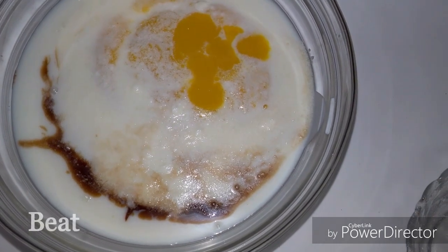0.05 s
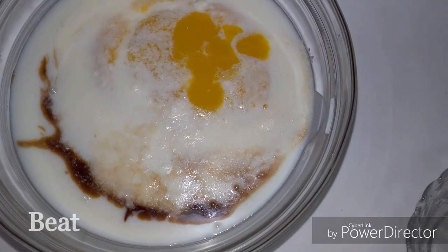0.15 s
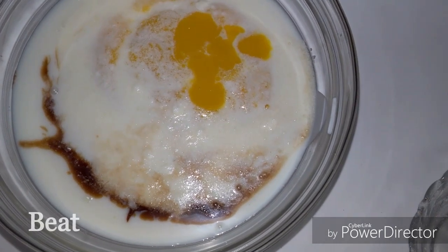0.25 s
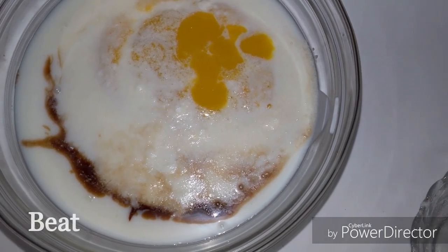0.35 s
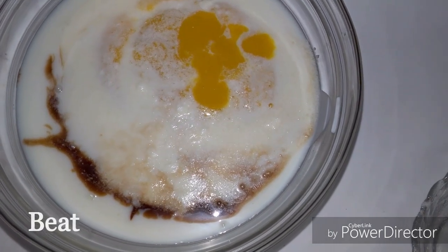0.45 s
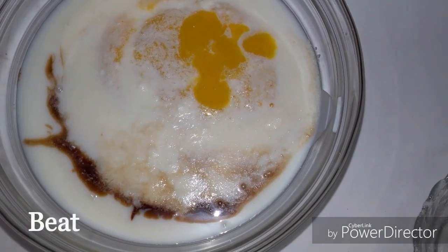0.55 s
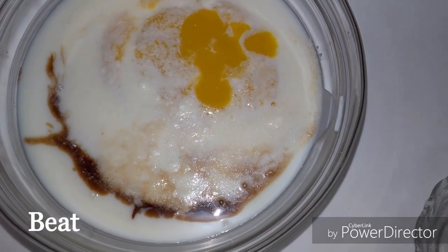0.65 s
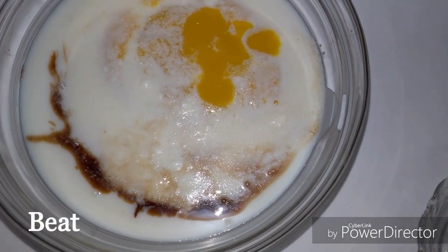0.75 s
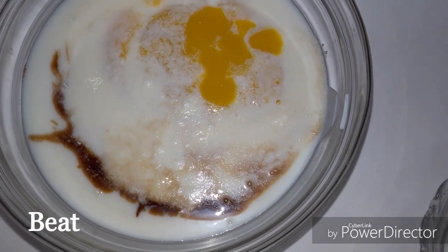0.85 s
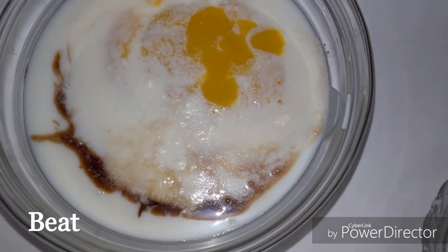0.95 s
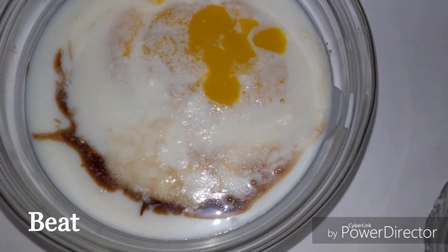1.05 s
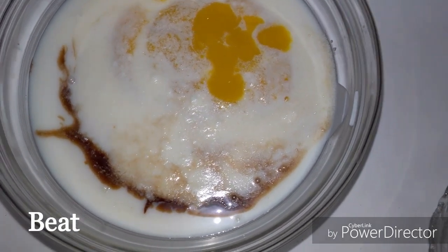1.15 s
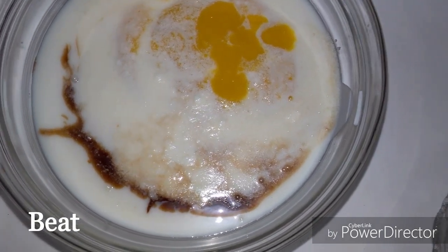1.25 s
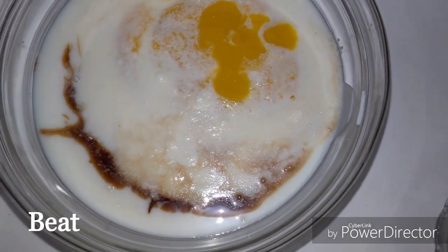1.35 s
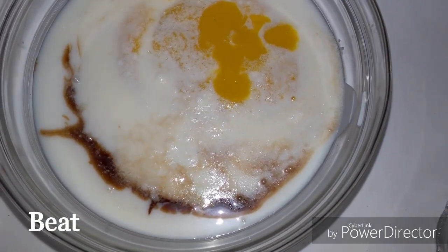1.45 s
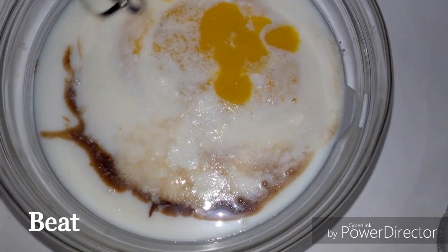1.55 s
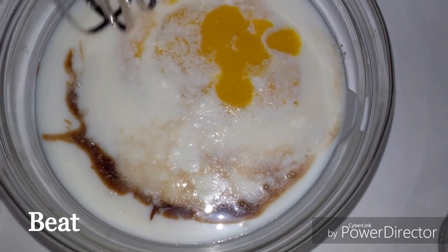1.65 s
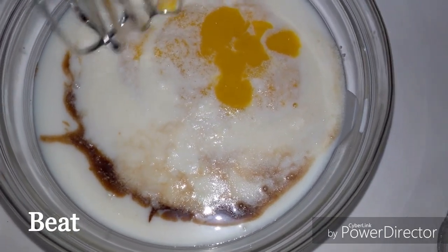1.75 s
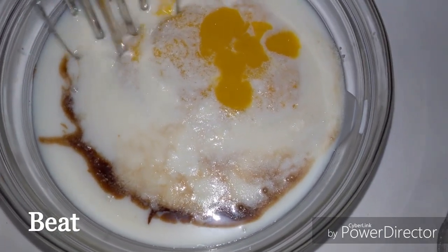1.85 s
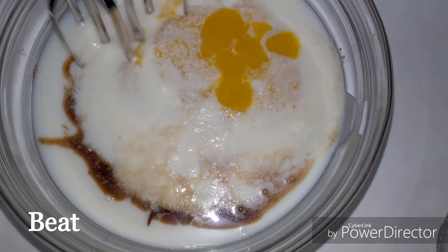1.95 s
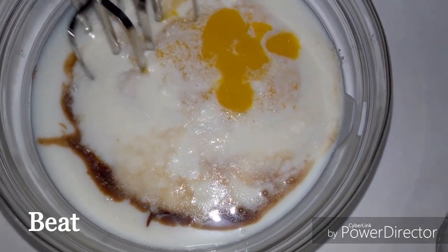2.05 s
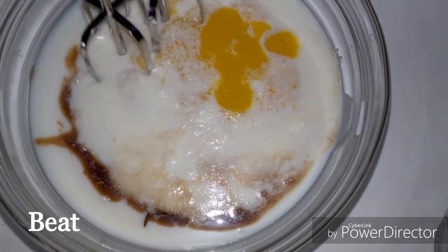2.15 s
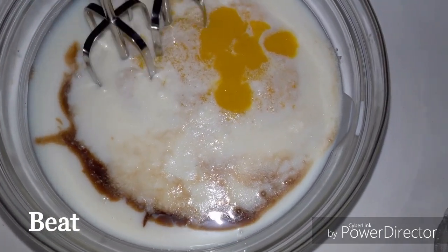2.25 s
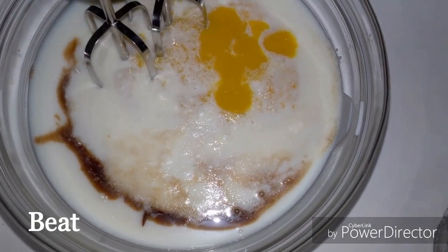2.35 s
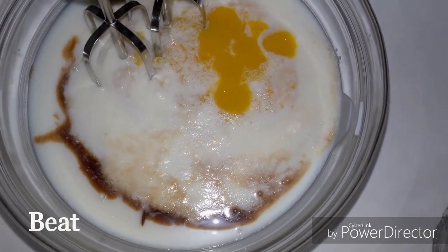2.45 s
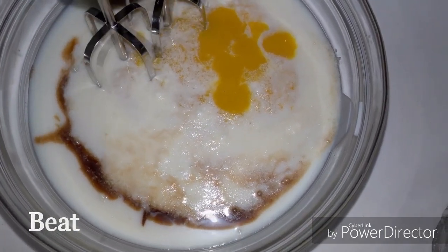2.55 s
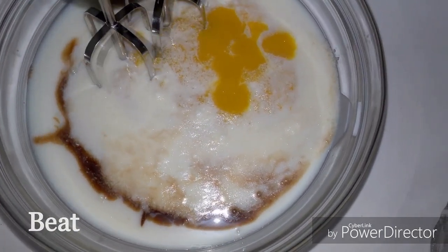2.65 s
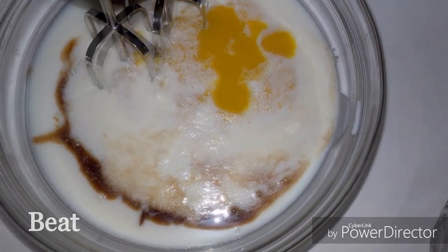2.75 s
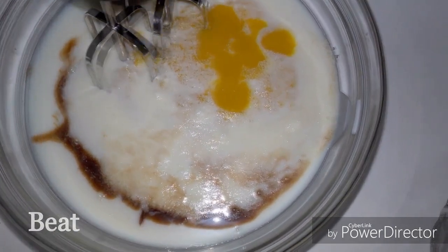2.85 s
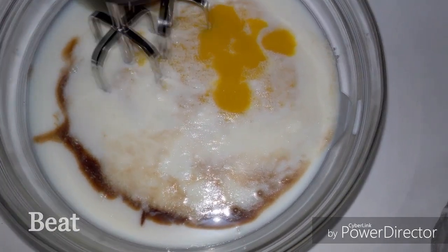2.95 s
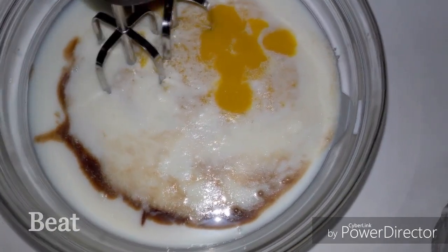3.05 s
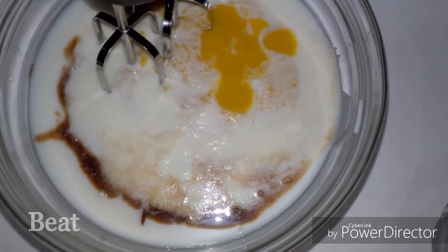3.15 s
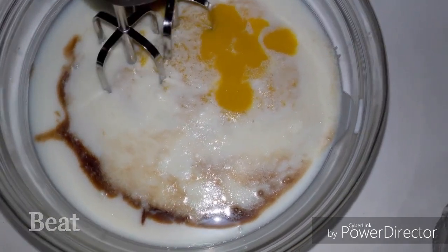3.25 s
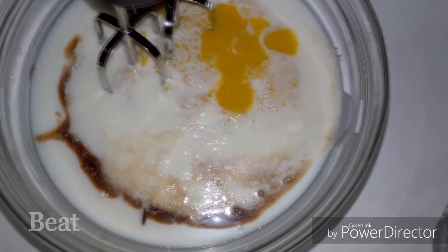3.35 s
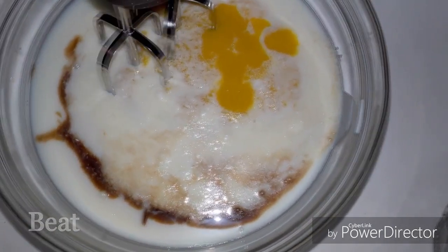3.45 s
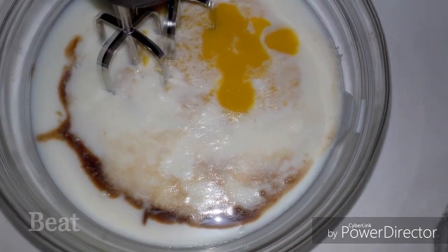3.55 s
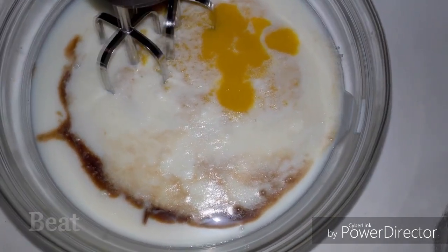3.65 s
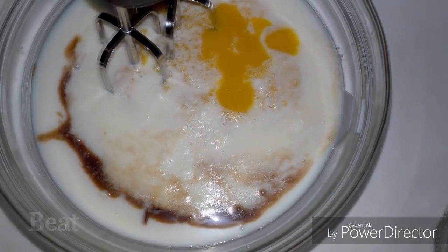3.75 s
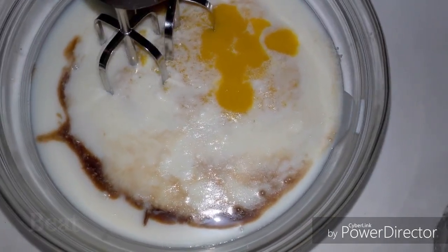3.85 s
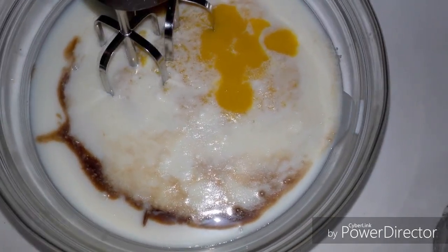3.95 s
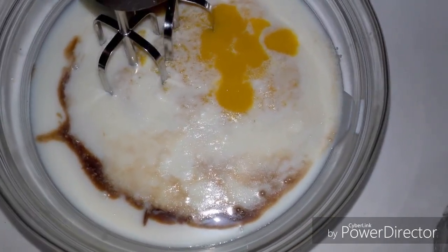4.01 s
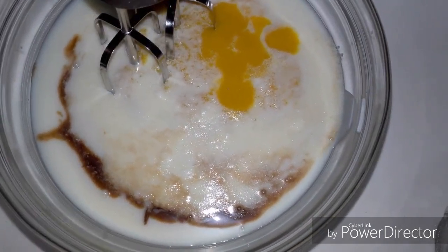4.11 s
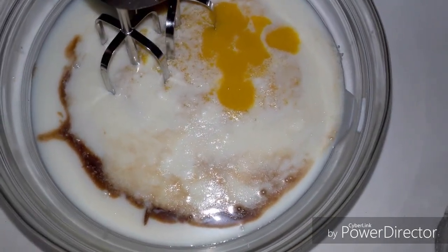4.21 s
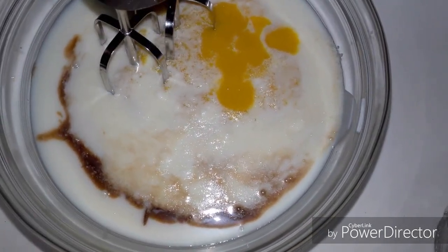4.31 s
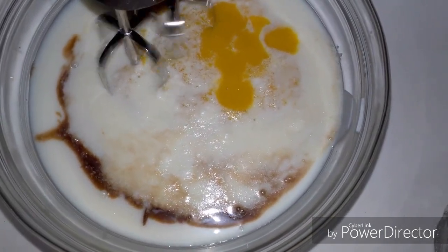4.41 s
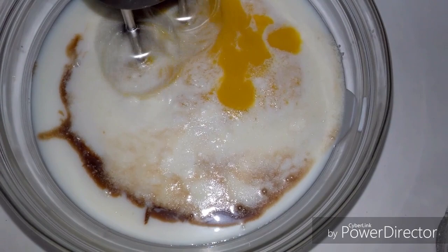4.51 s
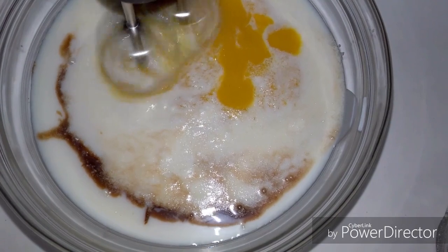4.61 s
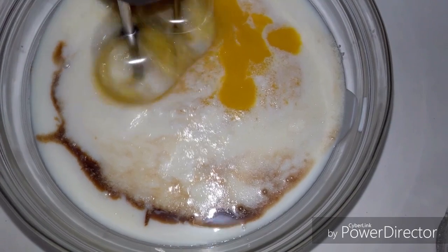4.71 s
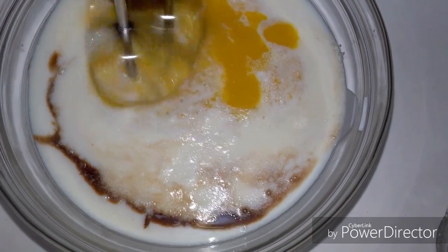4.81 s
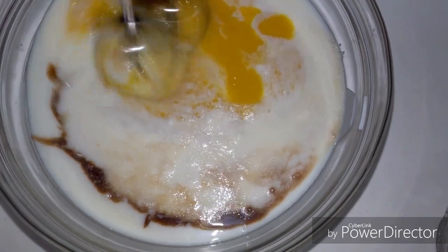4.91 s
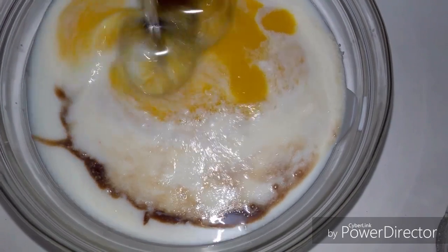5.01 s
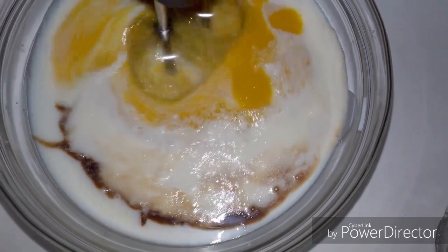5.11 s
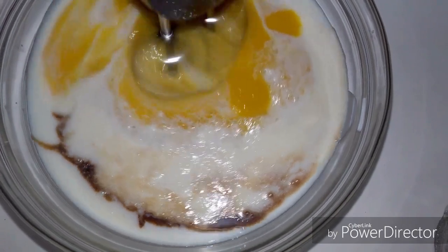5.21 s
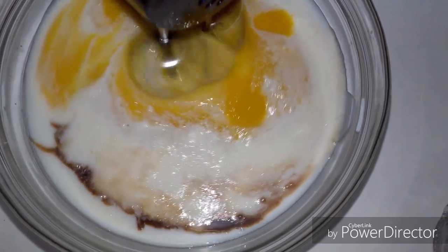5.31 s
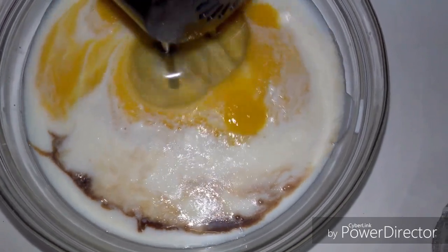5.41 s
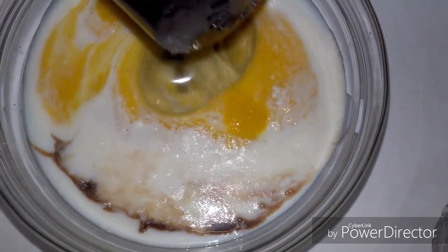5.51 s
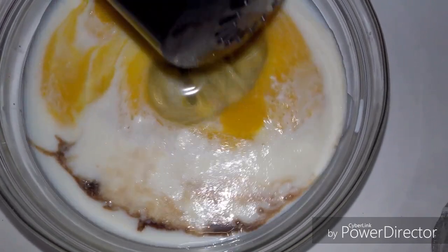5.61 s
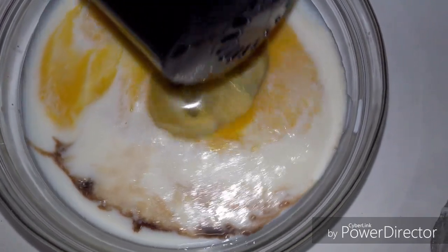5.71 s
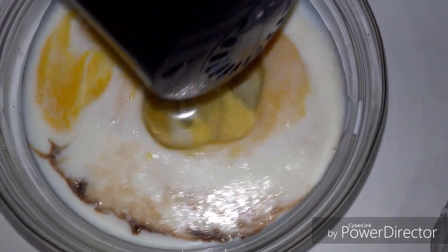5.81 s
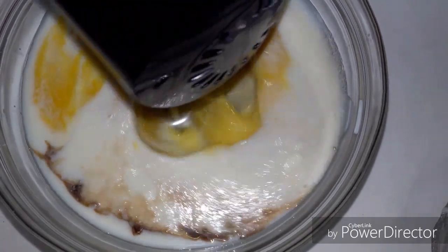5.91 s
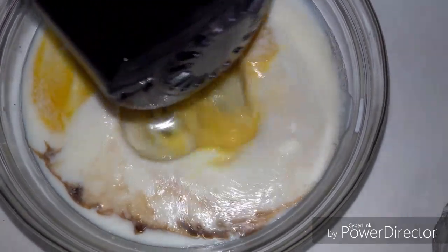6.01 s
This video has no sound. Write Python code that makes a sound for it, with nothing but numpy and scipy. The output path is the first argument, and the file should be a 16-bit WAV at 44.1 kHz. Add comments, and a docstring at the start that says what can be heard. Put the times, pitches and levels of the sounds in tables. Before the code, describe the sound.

Metal beaters clink and latch into a plastic mixer, a pause, then a switch clicks and the motor whines up to speed, churning liquid.

```python
"""Electric hand mixer in a kitchen

Steel beaters ring as decaying modes and knock into a plastic case as short noise-like bursts, over filtered
room noise that sinks slowly, then drops abruptly. A switch clicks on and a mains motor runs up: its speed
drives a slot whine, fan tones, a shaft hum, rushing air and brush hiss, while the beaters tap the case and
churn a liquid, heard as rising bubbles over a low swell."""
import sys
import numpy as np
from scipy import signal
from scipy.fft import rfft, irfft
from scipy.io import wavfile
from scipy.ndimage import uniform_filter1d

SR = 44100
rng = np.random.default_rng(int(sys.argv[2]) if len(sys.argv) > 2 else 0)


def transcribe(u):
    """Save the signal u as a 16-bit wav file named by the first command-line argument.

    u: samples, shape (n,) or (channels, n), limited to [-1, 1]; the rate is SR.
    q: integer samples, one column per channel.
    """
    v = np.clip(np.atleast_2d(u).T, -1, 1)
    q = np.round(v * 32767).astype(np.int16)
    wavfile.write(sys.argv[1], SR, q)


N = 267687
T = np.arange(N) / SR
HZ = np.fft.rfftfreq(N, 1 / SR)

# Noise spectra, relative levels: freq_hz, density_db (per Hz)
ROOM_SPECTRUM = [(18, -55), (30, -29), (32, -44), (59, -19.5), (270, -3), (389, -7.5), (591, -4),
                 (656, -12), (808, -7.5), (1080, -10.5), (1260, -11.5), (2360, -15), (5310, -30.5),
                 (11000, -29), (15500, -29.5)]
RUB_SPECTRUM = [(800, -11.0), (2500, 2.0), (4500, -6.0), (6500, -3.0), (9000, -8), (15000, -11.5)]
# the liquid starting to turn
HEAVE_SPECTRUM = [(30, -22), (70, -14), (115, 1), (190, -3), (400, -30), (2000, -70)]
# air through the vents
AIR_SPECTRUM = [(60, -30), (150, -17.5), (300, -9), (470, -13), (580, 0), (1000, -5.5), (2200, -2),
                (3400, 0), (4300, -18.5), (6000, -45), (15000, -40)]
# carbon brushes on the commutator
BRUSH_SPECTRUM = [(500, -43), (2000, -15.5), (3100, -6.5), (4300, -15.5), (5000, -11.5), (5900, -9.5),
                  (6300, -5), (6650, 0), (7100, -6.5), (7700, -11.5), (9300, -19), (10500, -20),
                  (12000, -25.5), (15500, -28)]

# Resonances, as humps added to a level or spectrum: centre_hz, width_hz, boost_db
# the room
ROOM_MODES = [(192, 54, 6), (271.6, 5.3, 9.5), (420, 200, -2.5), (635, 69, 3), (777, 185, 5.5),
              (1238, 37, 6)]
# the hollow plastic case
CASE_RESONANCES = [(662, 160, 24), (1190, 480, 13.5), (1720, 320, 4.5), (2840, 240, 4.5), (3250, 460, 11),
                   (4480, 280, -11.5), (5280, 220, 2), (6620, 580, 9), (7240, 390, 8.5)]
# the air vents
VENT_RESONANCES = [(654, 147, 10), (800, 105, 9), (1245, 290, 13), (1714, 210, 10.5), (1996, 65, 9.5),
                   (2405, 100, 9.5), (3060, 80, 12), (3220, 240, 4.5), (3800, 300, 14.5)]
# the motor frame, swept by the armature whine
FRAME_RESONANCES = [(1260, 630, 14), (2170, 200, 4), (2570, 190, 4.5), (2830, 570, 22.5)]
# the fan housing, swept by the fan tones
HOUSING_RESONANCES = [(1150, 380, 13), (3120, 520, 4.5), (3820, 230, 11), (4300, 630, -8.5),
                      (5320, 780, 6.5)]

# Ringing modes: mode_hz, level_db (relative), t60_s
# the two steel beaters
FIRST_BEATER = [(5700, -14, 0.13), (6400, -6.5, 0.14), (6660, -10.5, 0.11), (6700, -4.5, 0.092),
                (7540, -19, 0.16), (10940, -9.5, 0.24), (12060, -1, 0.11), (11820, -10, .08),
                (12810, -2, 0.14), (13780, -20, .05)]
SECOND_BEATER = [(4200, -5, 0.066), (5740, 6, 0.028), (6200, 3, 0.1), (7540, -10.5, .06), (8770, -6, 0.097),
                 (10530, -4, 0.12), (10070, -13, 0.13), (11190, -1, 0.14), (11400, -7, 0.14),
                 (12300, -6, .06), (14320, -4, 0.23)]
# the hard clack as a beater is picked up
CLACK_MODES = [(1655, -6, 0.12), (2130, 3, 0.044), (2207, 8.5, 0.038), (3005, -4, 0.052),
               (3850, -0.5, 0.052), (4280, -8, 0.11), (6620, -41, 0.11), (7870, -18, .08)]

# Hands sliding over the mixer: strongest_s, level_db, half_length_s
RUBS = [(0.02, -57, 0.026), (0.44, -52, 0.16), (1.15, -63, 0.36)]
# Beater clinks: start_s, ring_db, struck_hz, lead_db (boost of modes near struck_hz), beater (0 or 1),
# tick_db (contact tick relative to the ring)
CLINKS = [(.019, -43, 12100, 15, 0, -7), (.099, -42, 5717, 10, 0, -9), (.178, -42.5, 12200, -7, 0, -6),
          (.253, -43.5, 11440, -1, 1, -6), (.312, -40, 12200, 6, 0, -15), (.373, -38, 12100, 8, 0, -7),
          (0.397, -26, 12800, 23, 0, -10), (0.424, -20, 12800, 8, 0, -8), (.472, -26, 12800, 17, 0, -10),
          (.489, -29.5, 6800, 22, 0, -9), (0.694, -29.5, 14370, 0, 1, 0.5), (0.77, -40, 6450, -6, 0, -8),
          (.881, -48, 12100, 14, 0, -10), (1.557, -34, 14370, 3, 1, 3.5)]
# The hard clack, a single row: start_s, peak_db
CLACK = (.9258, -24.5)
# Knocks on the plastic case: start_s, snap_peak_db, snap_centre_hz, snap_t60_s, thud_peak_db
KNOCKS = [(0.166, -45, 7000, .04, -53), (.194, -44, 7000, .015, -50), (.343, -42, 4000, 0.043, -36),
          (.768, -35.5, 4200, 0.028, -34.5), (.909, -42, 6000, .024, -52), (.9255, -38, 7060, .04, -28.5),
          (0.943, -33.5, 11500, .05, -33.5), (1.289, -50, 7000, .06, -40.5),
          (1.5061, -23.5, 6500, 0.0094, -35.5), (2.178, -40, 12000, .02, -58),
          (2.304, -27.5, 7500, 0.0099, -24.5), (2.578, -35.5, 3220, 0.044, -35),
          (2.587, -22.5, 3430, 0.013, -24.5), (2.871, -40, 4300, .025, -32.5), (3.581, -66, 4370, .04, -49),
          (4.073, -58, 2800, .02, -54), (4.438, -67, 5000, .02, -60)]
# Spinning beaters tapping the case: start_s, peak_db, centre_hz
TAPS = [(4.9, -26, 1017), (4.946, -22.5, 1260), (5.936, -27, 1050), (6.012, -21, 1130)]
# The liquid heaving as the beaters set it moving, a single row: strongest_s, level_db, half_length_s
HEAVE = (5.0, -66.5, 0.38)
# The liquid slowing the motor as the beaters first catch it, a single row:
# deepest_s, sag_turns_per_s, half_length_s
DRAG = (4.83, 11, 0.1234)

# Room noise: level at the start, slow sink, and the moment it drops to its quiet level
ROOM_DB, ROOM_SINK_DB_PER_S, DROP_S, QUIET_DB = -47.5, 1.5, 3.24, -66.5
# Every knock is a short bright snap, then a broader, duller thud of the case
SNAP_OCTAVES = 0.35
THUD_DELAY_S, THUD_PITCH_SHARE, THUD_OCTAVES, THUD_T60_S = 0.0015, 0.46, 1.32, 0.052
# The switch slides home in quick clicks, each louder than the one before
SWITCH_S, SWITCH_GAP_S, SWITCH_FIRST_DB, SWITCH_STEP_DB = 4.5375, 0.0058, -39, 9
# Run-up: a quick surge, then a slow approach to top speed (shaft turns a second)
POWER_ON_S, TOP_SPEED, SURGE_SHARE, SURGE_S, APPROACH_S = 4.5341, 284.22, 0.532, 0.0944, 0.2762
# The motor sound fades in once the rotor has broken loose
RUNNING_S, RUNNING_RISE_S = 4.56, 0.023
# Motor layers: level at top speed, before any resonances, and growth per octave of speed
AIR_DB, AIR_DB_PER_OCTAVE, AIR_LEAST_DB = -29.5, 9, -38
BRUSH_DB, BRUSH_DB_PER_OCTAVE = -25.5, 19.5
BLADE_DB, BLADE_DB_PER_OCTAVE = -42.5, 10
OVERTONE_DB, OVERTONE_DB_PER_OCTAVE = -41, 8.5
# The whine follows only the frame resonances
ARMATURE_DB = -46.5
# Upper band limit of the microphone
EDGE_HZ = 15650


def gain_of(db):
    """Turns decibels into a gain factor."""
    return 10 ** (np.asarray(db) / 20)


def evened(x):
    """Scales a signal to an rms of 1."""
    return x / np.sqrt(np.mean(x ** 2) + 1e-20)


def read(points):
    """Joins spectrum points in dB along a log-frequency axis."""
    hz, db = np.transpose(points)
    return np.interp(np.log(HZ + 1), np.log(hz), db)


def humps(modes, at=HZ):
    """Sums the dB that a set of resonances adds at the given frequencies."""
    return sum(db / (1 + (2 * (at - hz) / width) ** 2) for hz, width, db in modes)


def coloured(x, db):
    """Filters by a dB spectrum and evens the result to an rms of 1."""
    return evened(irfft(rfft(x) * gain_of(db), N))


def drift(hz):
    """Makes slow random movement up to about the given rate, with an rms of 1."""
    return evened(irfft(rfft(rng.standard_normal(N)) * np.exp(-(HZ / hz) ** 2), N))


def swell(peak_s, half_length_s):
    """Draws a smooth bell-shaped rise and fall in time, with a peak of 1."""
    return np.exp(-((T - peak_s) / half_length_s) ** 2)


def high_pass(x, hz):
    """Takes away the bass below hz."""
    return signal.sosfilt(signal.butter(3, hz, "high", fs=SR, output="sos"), x)


def add(mix, start_s, sound):
    """Mixes a sound in at its start time."""
    part = mix[max(round(start_s * SR), 0):][:len(sound)]
    part += sound[:len(part)]


def ring(hz, db, t60):
    """Sums decaying sine modes in random phase, with a peak of 1."""
    t = np.arange(SR // 4)[:, None] / SR
    decay = gain_of(db - 60 * t / t60)
    tones = np.sin(2 * np.pi * (hz * t + rng.random(len(hz))))
    sound = (decay * tones).sum(axis=1)
    return sound / abs(sound).max()


def burst(centre_hz, octaves, t60, contact=0.058):
    """Packs dense, damped modes into a burst coloured by the hollow case, with a peak of 1."""
    t = np.arange(8192) / SR
    hz = np.fft.rfftfreq(len(t), 1 / SR)
    distance = np.log2((hz + 1) / centre_hz) / octaves
    shape = gain_of(humps(CASE_RESONANCES, hz)) / (1 + distance ** 2) ** 0.75
    # the parts scrape together for a moment (contact, a share of t60) before the sound dies away
    decay = gain_of(-60 * np.maximum(t / t60 - contact, 0))
    sound = irfft(shape * np.exp(2j * np.pi * rng.random(len(hz)))) * decay
    return sound / abs(sound).max()


def room_noise():
    """Humming noise through the room resonances, sinking slowly and then dropping abruptly."""
    level_db = ROOM_DB - ROOM_SINK_DB_PER_S * T
    dropped = np.clip((T - DROP_S) / 0.0022, 0, 1)
    level_db = level_db + dropped * (QUIET_DB - level_db)
    room = coloured(rng.standard_normal(N), read(ROOM_SPECTRUM) + humps(ROOM_MODES))
    return room * gain_of(level_db)


def hand_rubs():
    """Soft friction noise of hands on plastic, uneven as the pressure comes and goes."""
    rub = coloured(rng.standard_normal(N), read(RUB_SPECTRUM))
    pressure = sum(gain_of(db) * swell(s, length) for s, db, length in RUBS)
    return rub * pressure * gain_of(2 * drift(25.8))


def clinks(focus_hz=330, tick_t60=0.0397, grip_spread=0.14, detune=0.0017, uneven_db=7.0, chatter=0.24):
    """Each contact rings one beater, favouring the modes that move most where it is struck."""
    out, t = np.zeros(N), np.arange(SR // 4) / SR
    for start_s, ring_db, struck_hz, lead_db, beater, tick_db in CLINKS:
        hz, db, t60 = np.transpose(SECOND_BEATER if beater > .5 else FIRST_BEATER)
        # the grip of the fingers shifts, damps and weights every mode a little differently each time
        shift, damping, luck = rng.standard_normal((3, len(hz)))
        favour_db = lead_db * np.exp(-((hz - struck_hz) / focus_hz) ** 2)
        weight_db = db + favour_db + uneven_db * luck
        steel = ring(hz * (1 + detune * shift), weight_db, t60 * np.exp(grip_spread * damping))
        # the wires chatter against each other, which roughens the ring
        steel *= 1 + chatter * evened(uniform_filter1d(rng.standard_normal(len(t)), size=90))
        # differenced noise makes a bright tick
        tick = np.diff(rng.standard_normal(len(t) + 1)) * gain_of(-60 * t / tick_t60)
        tick /= abs(tick).max()
        add(out, start_s, gain_of(ring_db) * (steel + gain_of(tick_db) * tick))
    return out


def clack():
    """One hard contact rings a set of lower modes as a beater is picked up."""
    out = np.zeros(N)
    start_s, peak_db = CLACK
    add(out, start_s, gain_of(peak_db) * ring(*np.transpose(CLACK_MODES)))
    return out


def knocks():
    """The beaters are knocked and latched into the case: a snap, then a thud."""
    out = np.zeros(N)
    for start_s, snap_db, snap_hz, snap_t60, thud_db in KNOCKS:
        snap = burst(snap_hz, SNAP_OCTAVES, snap_t60)
        thud = burst(snap_hz * THUD_PITCH_SHARE, THUD_OCTAVES, THUD_T60_S)
        add(out, start_s, gain_of(snap_db) * snap)
        add(out, start_s + THUD_DELAY_S, gain_of(thud_db) * thud)
    return out


def switch(count=3, centre_hz=3000, octaves=1.6, t60=0.042):
    """The slide switch clicks over its detents, each exciting the case."""
    out = np.zeros(N)
    for k in range(count):
        click = burst(centre_hz, octaves, t60)
        add(out, SWITCH_S + k * SWITCH_GAP_S, gain_of(SWITCH_FIRST_DB + k * SWITCH_STEP_DB) * click)
    return out


def rattle(octaves=0.3, t60=0.042):
    """The spinning beaters tap the case now and then, in narrow-band bursts."""
    out = np.zeros(N)
    for start_s, peak_db, centre_hz in TAPS:
        add(out, start_s, gain_of(peak_db) * burst(centre_hz, octaves, t60))
    return out


def heave():
    """A low, soft swell of noise from the liquid starting to turn."""
    peak_s, level_db, half_length_s = HEAVE
    liquid = coloured(rng.standard_normal(N), read(HEAVE_SPECTRUM))
    return gain_of(level_db) * swell(peak_s, half_length_s) * liquid


def churn(start_s=4.68, per_s=130, level_db=-45, cycles=7):
    """The wires slap the liquid and leave small bubbles: decaying sines that rise in pitch."""
    out, t = np.zeros(N), np.arange(1500) / SR
    for hz in np.geomspace(600, 3200, num=20):
        bubble = np.sin(2 * np.pi * hz * t * (1 + 3 * t)) * np.exp(-t * hz / cycles)
        # the births are shared among the 20 bubble sizes
        births = (rng.random(N) < per_s / 20 / SR) * (T > start_s)
        strength = gain_of(4.9 * np.minimum(rng.exponential(1, N), 3))
        out += signal.oaconvolve(births * strength, bubble)[:N]
    # levelled before the bass is taken away
    return gain_of(level_db) * high_pass(out / out[T > start_s].std(), 600)


def kitchen(x, t60=0.17, wet_db=-12):
    """Short, dull reflections from the counter and walls, as sparse decaying noise taps."""
    t = np.arange(SR // 2) / SR
    sparse = (rng.random(len(t)) < .08) * (t > .004)
    taps = rng.standard_normal(len(t)) * sparse * gain_of(-60 * t / t60)
    # a one-pole low-pass dulls the tail
    tail = signal.lfilter([1], [1, -.35], taps)
    return x + gain_of(wet_db) * signal.fftconvolve(x, tail / np.linalg.norm(tail))[:N]


def shaft_speed():
    """Turns a second, from rest up towards top speed, held back for a moment by the liquid."""
    t = np.maximum(T - POWER_ON_S, 1 / SR)
    surge = SURGE_SHARE * np.exp(-t / SURGE_S)
    approach = (1 - SURGE_SHARE) * np.exp(-t / APPROACH_S)
    deepest_s, sag, half_length_s = DRAG
    return np.maximum(TOP_SPEED * (1 - surge - approach) - sag * swell(deepest_s, half_length_s), 1)


def armature_whine(speed, turn, pull, ripple=1.14):
    """Twelve slots a turn whine under the pulsing magnetic pull, swelling at the frame resonances."""
    slots = np.sin(12 * turn)
    level_db = ARMATURE_DB + humps(FRAME_RESONANCES, 12 * speed)
    return gain_of(level_db) * evened(slots * (0.047 + pull ** ripple))


def fan_tones(speed, turn, octaves, waver_db=2.3, waver_hz=9):
    """The 10-blade tone and its overtone waver, and swell and dip with the housing resonances."""
    layers = ((10, BLADE_DB, BLADE_DB_PER_OCTAVE), (20, OVERTONE_DB, OVERTONE_DB_PER_OCTAVE))
    fan = np.zeros(N)
    for order, db, slope in layers:
        level_db = db + slope * octaves + humps(HOUSING_RESONANCES, order * speed)
        level_db = level_db + waver_db * drift(waver_hz)
        fan += gain_of(level_db) * evened(np.sin(order * turn))
    return fan


def air_rush(speed, octaves, dull_hz=1400, brightening=0.71, low_hz=150):
    """Turbulent air through the vents, stirred by the beater wires, brighter and louder with speed."""
    stirred = rng.standard_normal(N) * gain_of(1.33 * drift(27))
    rush = coloured(stirred, read(AIR_SPECTRUM) + humps(VENT_RESONANCES))
    # slow air is dull: its upper part grows with the fan's speed
    dull = signal.sosfiltfilt(signal.butter(2, dull_hz, fs=SR, output="sos"), rush)
    rush = dull + (speed / TOP_SPEED) ** brightening * (rush - dull)
    rush *= gain_of(np.maximum(AIR_DB + AIR_DB_PER_OCTAVE * octaves, AIR_LEAST_DB))
    return high_pass(rush, low_hz)


def brush_hiss(turn, pull, octaves):
    """Carbon brushes scratch a little harder once a turn and with each peak of the current."""
    pressure_db = 0.7 * np.sin(turn) + 0.57 * pull + 0.56 * drift(120)
    scratch = rng.standard_normal(N) * gain_of(pressure_db)
    return gain_of(BRUSH_DB + BRUSH_DB_PER_OCTAVE * octaves) * coloured(scratch, read(BRUSH_SPECTRUM))


def motor(shaft_db=-59, mains_peak_s=0.0031):
    """A series motor on 50 Hz mains with a fan and a slotted armature; its speed drives every layer."""
    speed = shaft_speed()
    octaves = np.log2(speed / TOP_SPEED)
    running = np.clip((T - RUNNING_S) / RUNNING_RISE_S, 0, 1)
    # shaft angle in radians, with a slight unsteadiness of speed
    turn = 2 * np.pi * np.cumsum(speed * (1 + .0006 * drift(40) + .0003 * drift(4))) / SR
    # the current, and with it the magnetic pull on the slots, peaks twice in each mains cycle
    pull = np.cos(2 * np.pi * 50 * (T - mains_peak_s)) ** 2
    # the rotor is slightly out of balance and hums once a turn
    imbalance = gain_of(shaft_db) * (speed / TOP_SPEED) ** 2 * np.sin(turn)
    tones = armature_whine(speed, turn, pull) + fan_tones(speed, turn, octaves) + imbalance
    noises = air_rush(speed, octaves) + brush_hiss(turn, pull, octaves)
    return running * (tones + noises)


def scene():
    """Handling noises and churning in the room, the motor close by, the background under all."""
    background = room_noise() + hand_rubs()
    # the case is too small to give bass
    case = high_pass(knocks() + switch() + rattle(), 200)
    in_room = kitchen(clinks() + clack() + case + churn())
    mono = background + in_room + heave() + motor()
    return np.array([mono, mono])


def record(dry):
    """One microphone on both channels, with a steep band limit."""
    band_limit = signal.firwin(511, EDGE_HZ, window=("kaiser", 9), fs=SR)
    return signal.oaconvolve(dry, band_limit[None], "same")


dry = scene()
out = record(dry)
transcribe(out)
```